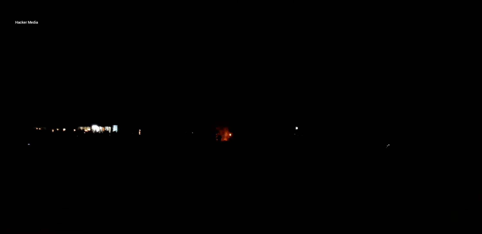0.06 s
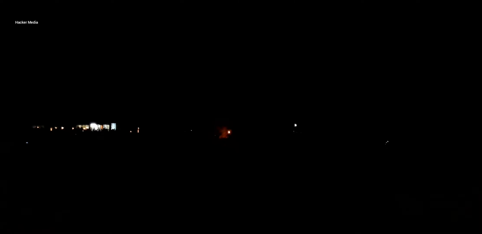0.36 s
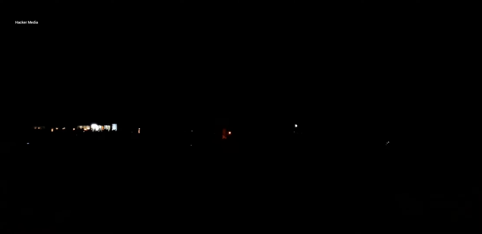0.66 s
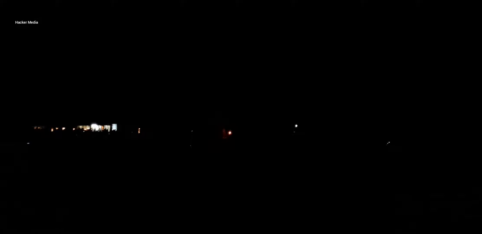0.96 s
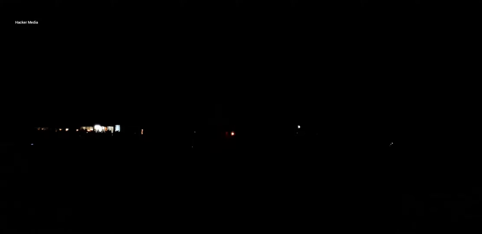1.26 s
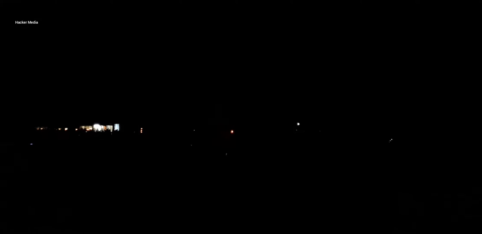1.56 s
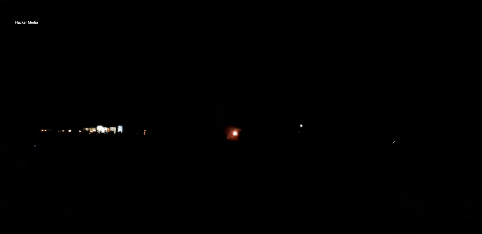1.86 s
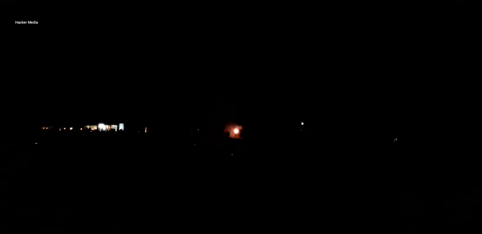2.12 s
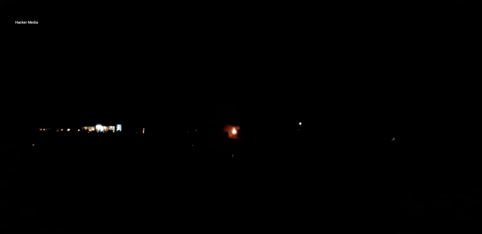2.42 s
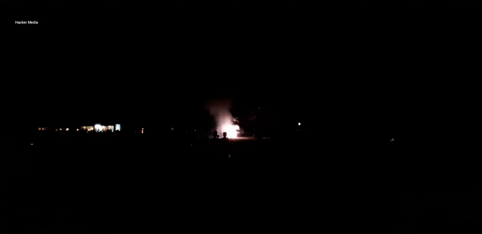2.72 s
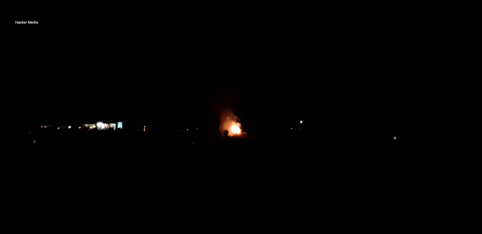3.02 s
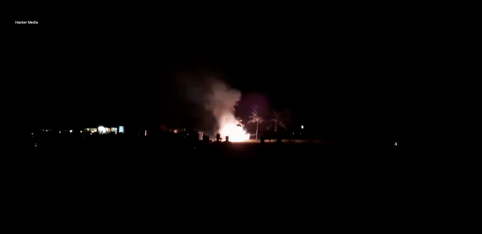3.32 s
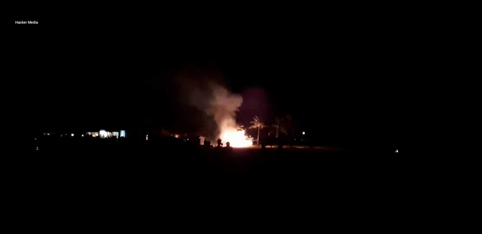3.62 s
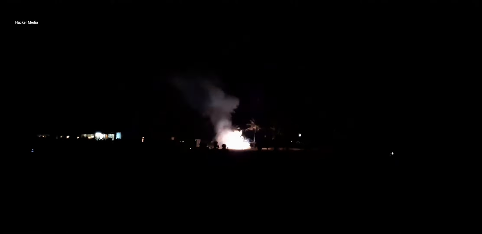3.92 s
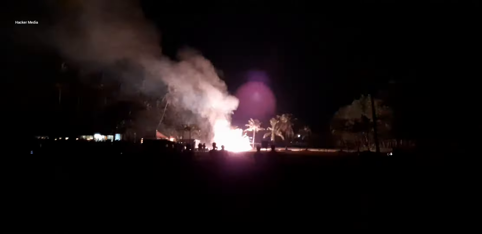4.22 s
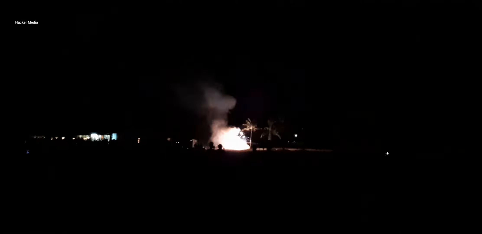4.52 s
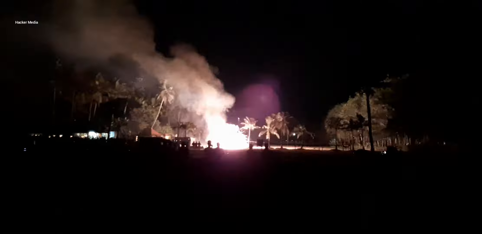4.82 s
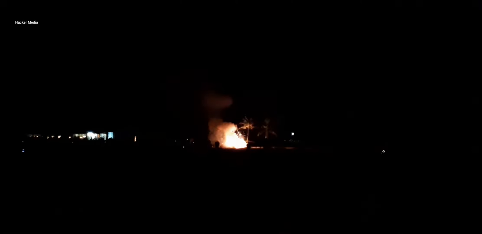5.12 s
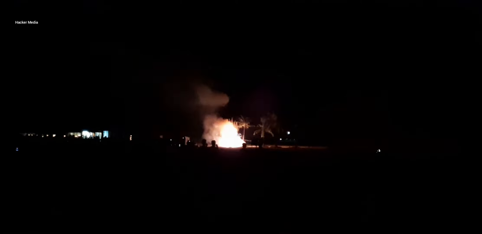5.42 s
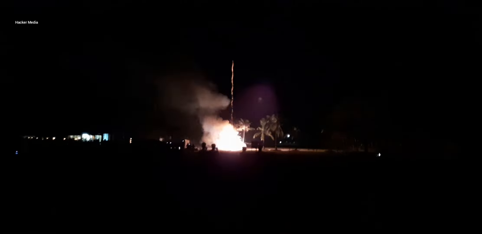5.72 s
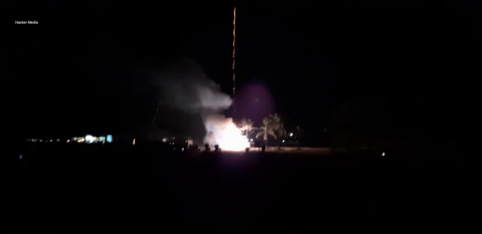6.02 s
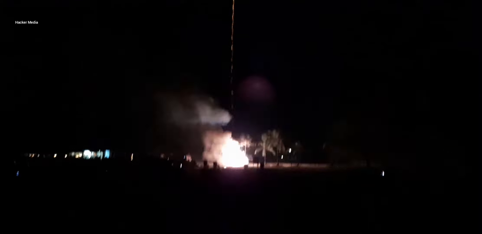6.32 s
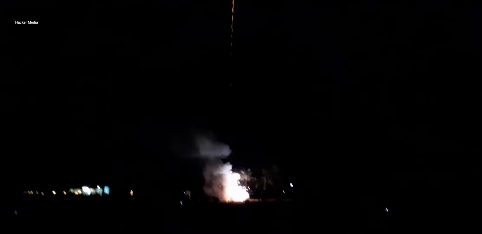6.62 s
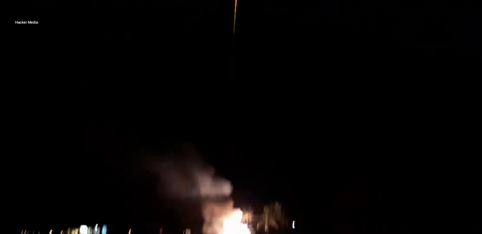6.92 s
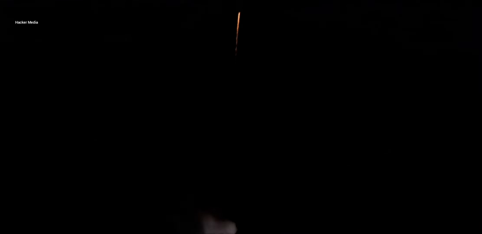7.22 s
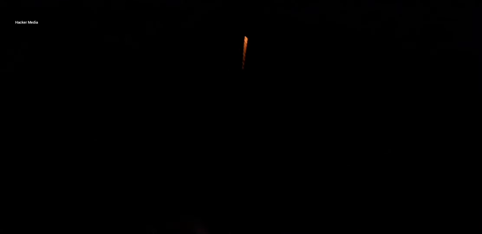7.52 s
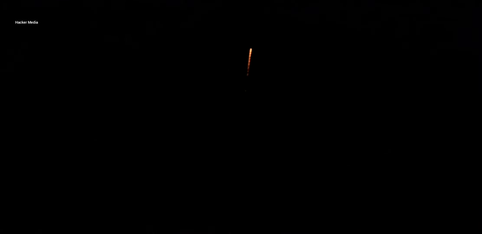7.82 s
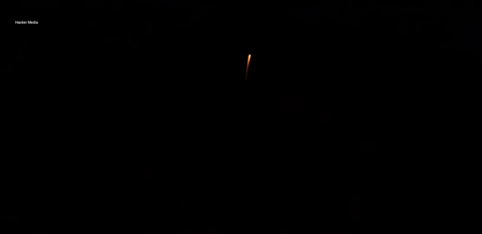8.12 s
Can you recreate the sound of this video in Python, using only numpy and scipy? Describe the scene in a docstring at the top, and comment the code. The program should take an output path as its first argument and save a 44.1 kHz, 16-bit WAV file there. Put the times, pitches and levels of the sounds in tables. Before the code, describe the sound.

A distant bang fades under night insects, then a ground firework erupts with hissing sparks, dense popping crackers and deep mortar thumps.

```python
"""A far bang rumbles away over a night field while a katydid and a cricket rub their wings in song.
A faint squeal, a far thud and small snaps follow. Then a ground firework lights: crackers pop over
a hissing jet of sparks, and powder charges thump shells out of mortars. The tree line throws
the thumps back; a small two-port microphone with a limiter takes it in."""
import sys
import numpy as np
from scipy import signal
from scipy.io import wavfile
from scipy.ndimage import uniform_filter1d, minimum_filter1d

SR = 44100
rng = np.random.default_rng(int(sys.argv[2]) if len(sys.argv) > 2 else 0)


def store_wav(level_fs):
    """Save 16-bit WAV to argv[1]."""
    pcm = np.round(np.clip(np.atleast_2d(level_fs), -1, 1) * 32767)
    wavfile.write(sys.argv[1], SR, pcm.T.astype(np.int16))


N = 368579
TIME = np.arange(N) / SR
PORT_LAG_S = 4 / SR  # the left port hears the firework first


def gain_of(db):
    """Decibels to gain."""
    return 10 ** (np.asarray(db) / 20)


def unit_rms(x):
    """Scales to rms 1."""
    return x / np.sqrt(np.mean(x ** 2) + 1e-20)


def curve_at(points, hz):
    """Reads a curve on a log-frequency axis."""
    f, value = np.transpose(points)
    return np.interp(np.log(hz + 1), np.log(f + 1), value)


def add(mix, s, sound):
    """Mixes a sound in at s seconds."""
    part = mix[..., max(round(s * SR), 0):][..., :sound.shape[-1]]
    part += sound[..., :part.shape[-1]]


def equalise(x, eq, size=2048):
    """Minimum-phase EQ: the ringing follows each click."""
    log_gain = np.log(gain_of(curve_at(eq, abs(np.fft.fftfreq(size, 1 / SR)))))
    taps = np.fft.ifft(np.exp(np.conj(signal.hilbert(log_gain)))).real
    return signal.oaconvolve(x, taps[:size // 2] / abs(taps).max())[:len(x)]


def ports(x):
    """One direct sound at both microphone ports, slightly later on the right."""
    return np.array([x, np.interp(TIME - PORT_LAG_S, TIME, x)])


# How alike the two ports hear a noise bed: f/Hz, coherence/0-1
COHERENCE = [(50, 1), (150, 0.9), (400, 0.75), (1200, 0.095), (3000, 0.3), (6000, 0.039), (15000, 0.049)]
def noise_bed(eq, patchy_db, lag_s=0, size=512):
    """Partly coherent stereo noise at rms 1, with patches of its spectrum swelling and fading."""
    frames, hz = N // (size // 4) + 5, np.fft.rfftfreq(size, 1 / SR)
    a, b, c, d, patches = rng.standard_normal((5, frames, len(hz)))
    patches = unit_rms(uniform_filter1d(uniform_filter1d(patches, size=10, axis=0), size=9, axis=1))
    alike = curve_at(COHERENCE, hz)
    left = a + 1j * b
    right = (alike * left + np.sqrt(1 - alike ** 2) * (c + 1j * d)) * np.exp(-2j * np.pi * hz * lag_s)
    spectra = np.array([left, right]) * gain_of(curve_at(eq, hz) + patchy_db * patches)
    _, bed = signal.istft(spectra.swapaxes(1, 2), nperseg=size, noverlap=size * 3 // 4)
    return unit_rms(bed[:, :N])


# Decay time of the open field: f/Hz, t60/s
FIELD_DECAY = [(100, 0.25), (500, 0.91), (1500, 0.3), (4000, 0.95), (12000, 0.072)]
def field_reverb(x, length_s=0.5, size=256):
    """Sparse reflections from ground, people and trees, different at each port."""
    n = int(length_s * SR)
    taps = rng.standard_normal((2, SR))[:, :n] * (rng.random((2, SR))[:, :n] < .15)
    taps[:, :SR // 1000] = 0  # pre-delay
    hz, t, spectra = signal.stft(taps, SR, nperseg=size)
    decay = gain_of(-60 * t / curve_at(FIELD_DECAY, hz)[:, None])
    _, tail = signal.istft(spectra * decay, SR, nperseg=size)
    return signal.oaconvolve(x[None], tail / np.linalg.norm(tail, axis=1)[:, None], axes=1)[:, :N]


# Dark tone of the far bang: f/Hz, relative level/dB
RUMBLE_EQ = [(25, -22), (60, -12), (115, -1.5), (210, -13.5), (430, -0.5), (830, -11), (1600, -22),
             (3500, -37.5), (7000, -69)]
def far_rumble(crest_s=0.38, crest_db=-37.5, rise_db_per_s=8, fall_db_per_s=13, floor_db=-60):
    """A far bang swells, then rolls away into a low floor."""
    age = TIME - crest_s
    roll = gain_of(crest_db + np.minimum(rise_db_per_s * age, -fall_db_per_s * age))
    second_swell = gain_of(-43.5) * np.exp(-((TIME - .97) / 0.057) ** 2)
    level = np.sqrt(roll ** 2 + second_swell ** 2 + gain_of(floor_db) ** 2)
    return level * noise_bed(RUMBLE_EQ, patchy_db=2.5, size=2048)


# Tone of the night ambience: f/Hz, relative level/dB
CHORUS_EQ = [(300, -7), (1200, -14), (2000, -14.5), (3000, -10.5), (5200, -11), (6100, -16), (7770, -4),
             (9000, -14), (10300, -11.5), (13500, -33)]
def insect_chorus(level_db=-58):
    """Distant insects blur into a steady bed."""
    return gain_of(level_db) * noise_bed(CHORUS_EQ, patchy_db=3.5)


def katydid(first_s=0.099, every_s=.169, chirp_s=0.067, strokes_per_s=185, level_db=-43, fade_s=0.64):
    """Chirps on a steady beat, each a quick train of wing strokes that slide down in pitch."""
    song, t = np.zeros(N), np.arange(int(chirp_s * SR)) / SR
    for s in first_s + every_s * np.arange(16) + 0.0038 * rng.standard_normal(16):
        wobble = unit_rms(uniform_filter1d(rng.standard_normal(len(t)), size=240))
        stroke_phase = np.cumsum(strokes_per_s * (1 + 0.13 * wobble)) / SR % 1
        hz = 8350 - 1150 * stroke_phase - 300 * (t / chirp_s - .5)
        chirp = np.sin(np.pi * stroke_phase) ** 2 * np.sin(2 * np.pi * np.cumsum(hz) / SR)
        envelope = signal.windows.tukey(len(t), .3) * min((s + chirp_s) / fade_s, 1)
        add(song, s, gain_of(level_db + rng.normal()) * envelope * chirp)
    return song + gain_of(-4) * field_reverb(song)


# Cricket phrases: first stroke t/s, last stroke t/s, stroke count, stroke length/s
CRICKET_PHRASES = [(.115, .355, 5, .032), (.48, .835, 14, .021), (1.054, 1.353, 6, .032),
                   (1.468, 1.92, 19, .02), (2.184, 2.494, 6, .032), (2.628, 2.812, 8, .02)]
def cricket(top_hz=5980, end_hz=5080, level_db=-57, fade_s=0.2):
    """Each wing stroke is a falling whistle; slow and fast phrases take turns."""
    song = np.zeros(N)
    for first, last, strokes, length in CRICKET_PHRASES:
        progress = np.linspace(0, 1, int(length * SR))
        for s in np.linspace(first, last, strokes):
            hz = (top_hz + (end_hz - top_hz) * progress ** 0.8) * rng.uniform(0.96, 1.015)
            whistle = np.sin(np.pi * progress) * np.sin(2 * np.pi * np.cumsum(hz) / SR)
            add(song, s, gain_of(level_db + 0.5 * rng.normal()) * whistle)
    song *= np.minimum(TIME / fade_s, 1)
    return song + gain_of(-8.5) * field_reverb(song)


# Glide of the faint squeal: t/s, level/dB, f/Hz
SQUEAL_GLIDE = [(.55, -72, 3130), (.66, -58, 3150), (.73, -67, 3280), (.9, -61.5, 3520), (1.25, -68, 3830)]
def squeal(width_hz=300):
    """A breathy, rising tone from far away."""
    s, level_db, hz = np.transpose(SQUEAL_GLIDE)
    lowpass = signal.butter(2, width_hz / 2, fs=SR, output="sos")
    breath = signal.sosfilt(lowpass, rng.standard_normal((2, N)))
    tone = unit_rms(breath * np.sin(2 * np.pi * np.cumsum(np.interp(TIME, s, hz)) / SR))
    return tone * np.interp(TIME, s, gain_of(level_db), left=0, right=0)


# Powder blasts (a far thud, the igniter, then the mortars):
# t/s, thump level/dB, f/Hz, crack level/dB, tail level/dB
BLASTS = [(.945, -34.5, 115, -52, -47), (2.844, -28, 132, -19, -59), (3.054, -1, 119, -3.5, -16),
          (3.107, -0.5, 132, -21, -17), (4.478, -6, 129, -10, -26), (5.038, -2.5, 131.4, -3, -19.5),
          (5.081, -5, 136, -8, -22.5), (6.344, -13, 148, -10, -33.5), (7.007, -11.5, 146, -8.5, -37),
          (7.162, -12.5, 130, -8, -33), (8.294, -13, 133.5, -9, -34)]
# Boomy tone of their rolling tail: f/Hz, relative level/dB
TAIL_EQ = [(25, -24), (60, -12), (105, 4), (185, -7), (250, -8), (500, -6.5), (1200, -26), (6000, -80)]
def powder_blasts(echo_s=0.055, echo_db=-4, front_s=.0009, tail_rise_s=0.0068, tail_decay_s=0.26):
    """A charge gives a steep shock front, a low thump and a crack; trees return it and let it roll on."""
    body, cracks, overload_clicks, tail_power = np.zeros((4, N))
    t = np.arange(3 * SR // 2) / SR
    for s, db, hz, crack_db, tail_db in BLASTS:
        age = t * hz / 0.75  # the thump's envelope peaks 3/4 of a cycle in
        thump = -age ** 2 * np.exp(2 * (1 - age)) * np.cos(2 * np.pi * hz * t)
        add(body, s, gain_of(db) * thump)
        add(body, s + echo_s, gain_of(db + echo_db) * thump)
        onset = s - .002
        add(body, onset, gain_of(crack_db) * (1 - t / front_s) * np.exp(-t / front_s))
        rush = gain_of(crack_db) * rng.standard_normal(len(t))
        add(cracks, onset, rush * (np.exp(-t / 0.0054) + 0.65 * np.exp(-t / 0.024)))
        add(overload_clicks, onset, gain_of(-6) * rush * np.exp(-t / 0.0009))
        tail = gain_of(tail_db) * (1 - np.exp(-t / tail_rise_s)) * np.exp(-t / tail_decay_s)
        add(tail_power, s, tail ** 2)
    # each blast overloads the microphone with a brief bright click; the rush behind it is dull
    cracks = overload_clicks + signal.lfilter(*signal.butter(1, 1500, fs=SR), cracks)
    direct = ports(body + cracks) * gain_of([[.5], [-.5]])
    return direct + np.sqrt(tail_power) * noise_bed(TAIL_EQ, patchy_db=2.5, size=2048)


# Dull tone of the tree line's return: f/Hz, relative level/dB
TREES_EQ = [(60, -11), (200, -7), (330, 0), (600, 0.5), (1300, -28), (4000, -28)]
def tree_echo(delay_s=0.2, smear_s=0.076, return_db=-24):
    """The blasts come back from the tree line, late, smeared and thin in the bass."""
    power = sum(gain_of(db + return_db) ** 2 * np.exp(-((TIME - s - delay_s) / smear_s) ** 2)
                for s, db, *_ in BLASTS)
    return np.sqrt(power) * noise_bed(TREES_EQ, patchy_db=2.5, size=1024)


# Cues for the small snaps: t/s, peak level/dB, f/Hz
SNAPS = [(1.297, -39.5, 1370), (1.568, -41.5, 3670), (1.891, -44, 1200), (2.257, -42.5, 4160),
         (2.881, -21, 860), (2.905, -19, 3100)]
def small_snaps(decay_s=0.0046):
    """Short damped snaps, each ringing around its own pitch."""
    out, t = np.zeros(N), np.arange(SR // 20) / SR
    for s, db, hz in SNAPS:
        band = signal.butter(2, [hz - 450, hz + 450], "bandpass", fs=SR, output="sos")
        ring = signal.sosfilt(band, rng.standard_normal(len(t)) * np.exp(-t / decay_s))
        add(out, s, gain_of(db) * ring / abs(ring).max())
    return out


# How hard the fountain burns: t/s, level/dB
BURN_FADER = [(2.86, -28.5), (3.02, -34), (3.06, -26), (3.17, -17.5), (3.5, -27.5), (3.62, -23),
              (4.4, -24.5), (4.56, -21.5), (4.98, -25), (5.1, -29), (5.42, -24), (6.1, -22.5), (6.62, -21),
              (7.0, -29), (7.01, -23), (7.3, -23), (8.1, -28.5), (8.36, -19.5)]
def burn_envelope(flare_db=-17.5, flare_rise_s=0.0095, flare_decay_s=0.2, spray_decay_s=0.018):
    """The jet's strength: every blast fans it, and crackers throw in short sprays of sparks."""
    power = gain_of(np.interp(TIME, *np.transpose(BURN_FADER), left=-120)) ** 2
    power += (gain_of(-23) * volley_envelope()) ** 2
    age = np.arange(SR) / SR
    flare = (1 - np.exp(-age / flare_rise_s)) * np.exp(-age / flare_decay_s)
    for s, db, *_ in BLASTS:
        add(power, s, (gain_of(db + flare_db) * flare) ** 2)
    for s, db in SINGLE_POPS:
        add(power, s, (gain_of(db - 23.5) * np.exp(-age / spray_decay_s)) ** 2)
    return np.sqrt(power)


# Tone of the jet and its sparks: f/Hz, relative level/dB
HISS_EQ = [(40, -53), (140, 5), (320, -41.5), (700, 2), (1500, 3.5), (2300, 0), (3000, 1), (4200, -1),
           (5500, -9.5), (7600, -11), (9500, -20), (12000, -16), (15500, -31)]
# Rise and fall of the flames' low roar: t/s, relative level/dB
ROAR_FADER = [(2.87, -39), (3.01, -42), (3.1, -29.5), (4.04, -34), (4.5, -30), (6.62, -28.5), (6.9, -35),
              (8.14, -46)]
# Tone of that roar: f/Hz, relative level/dB
ROAR_EQ = [(40, -35), (130, 1), (250, -13), (480, 7), (750, 3), (1400, -22), (4000, -51)]
def fountain(lit_s=2.839, flutter_db=1.81, sparks_per_s=900, spits_per_s=45, spit_decay_s=0.0032):
    """A burning jet flutters, hisses and roars, with tiny snaps of sparks and short bright spits."""
    flutter = unit_rms(uniform_filter1d(uniform_filter1d(rng.standard_normal(N), size=500), size=200))
    jet = noise_bed(HISS_EQ, patchy_db=2, lag_s=PORT_LAG_S) * gain_of(flutter_db * flutter)
    # the jet is brighter the harder it burns, and for a moment when a grain of metal flares
    burn = burn_envelope()
    grains = (rng.random(N) < spits_per_s / SR) * np.minimum(rng.exponential(1, N), 3)
    spits = signal.lfilter([1], [1, -np.exp(-1 / (spit_decay_s * SR))], grains)
    jet += (gain_of(-5) * spits + gain_of(8) * burn) * np.diff(jet, prepend=0)
    clicks = (rng.random(N) < sparks_per_s / SR) * gain_of(8.5 * np.minimum(rng.exponential(1, N), 4))
    clicks *= rng.choice([-1, 1], N)
    sparks = gain_of(-9) * ports(unit_rms(equalise(clicks, HISS_EQ)))
    roar_level = gain_of(np.interp(TIME, *np.transpose(ROAR_FADER)) + 0.5)
    roar = roar_level * noise_bed(ROAR_EQ, patchy_db=3.5, size=1024)
    lit = np.clip((TIME - lit_s) / .004, 0, 1)
    return lit * (burn * (jet + sparks) + roar)


def pop(centre_hz=1280, ring_s=.00045, scatter_s=0.0047):
    """One cracker in stereo: a dry shock, one swing of its own pitch and a spray of close reflections."""
    t = np.arange(SR // 40) / SR
    hz = centre_hz * rng.uniform(.7, 1.3)
    shock = 0.2 * np.exp(-t / ring_s) * np.cos(2 * np.pi * hz * t)
    shock[0] += 1
    # one near reflection doubles the crack
    shock += rng.uniform(0, .7) * np.roll(shock, int(rng.uniform(.001, .004) * SR))
    shared, *each_port = rng.standard_normal((3, len(t)))
    return shock + .055 * np.exp(-t / scatter_s) * (shared + 1.14 * np.array(each_port))


# Crackers that stand out, with the sharp crack of the 5.04 s mortar launch at 5.036 s: t/s, relative level/dB
SINGLE_POPS = [(2.843, -7), (3.028, -5.5), (3.27, -3), (3.364, -2), (3.373, -1), (3.408, -4), (3.432, -6),
               (3.469, -2), (3.519, -7), (3.553, -5.5), (3.594, -5), (3.693, -6), (3.882, -3), (4.005, -3),
               (4.056, -5.5), (4.147, -6), (4.191, -4), (4.21, -4), (4.243, 0), (4.325, -3), (4.342, -5),
               (4.437, -7), (4.679, -3), (4.745, -2.5), (4.793, -7), (4.813, -4), (4.938, -5), (4.982, -6),
               (5.036, -4), (5.231, -4), (5.399, -3.5), (5.41, -4), (5.583, 0), (5.616, -1.5),
               (5.725, -2.5), (5.745, -4.5), (5.823, -3.5), (5.832, -3), (5.854, -5), (6.61, -6),
               (6.697, -5.5), (6.808, -7), (6.891, -1.5), (7.006, -1), (7.019, -5), (7.026, -5),
               (7.053, -2.5), (7.082, -1), (7.123, -5.5), (7.374, -7.5), (7.463, -6), (7.481, -5.5),
               (7.521, -1.5), (7.547, -5.5), (7.579, -4), (7.68, -6.5), (7.69, -6), (7.78, -6.5),
               (7.905, -6.5), (7.958, -7), (7.981, -9), (8.049, -9), (8.062, -9), (8.105, -4.5),
               (8.157, -5), (8.199, -3)]
# Strings of crackers firing in quick succession: t/s, length/s, relative level/dB
CRACKER_VOLLEYS = [(3.067, 0.026, -3), (3.821, 0.19, -11), (4.329, 0.036, -6.5), (4.447, 0.2, -8.5),
                   (5.482, 0.059, -4), (5.626, 0.072, -10.5), (5.871, 0.58, -6.5), (6.479, 0.12, -7.5),
                   (7.066, .045, -9), (7.149, .12, -5.5), (7.561, 0.091, -12), (7.785, 0.069, -6),
                   (8.163, 0.11, -9)]
# Tone of a cracker: f/Hz, relative level/dB
POP_EQ = [(60, -21), (250, -23.5), (550, -10), (780, 0), (1600, 1), (2150, -10), (2900, -6), (5500, -13.5),
          (9500, -26.5), (12000, -20.5), (16000, -30)]
def crackers(swarm_per_s=130, volley_per_s=75, strays_per_s=16, reverb_db=-13):
    """Single crackers, volleys and random strays stand out of a swarm of smaller ones."""
    loud, swarm = np.zeros((2, 2, N))
    for s, db in SINGLE_POPS:
        add(loud, s, gain_of(db) * pop())
    for s in rng.uniform(0, N / SR, int(swarm_per_s * N / SR)):
        add(swarm, s, gain_of(2 * min(rng.normal(), 1.6)) * pop())
    for start, length, db in CRACKER_VOLLEYS:
        for s in np.arange(start, start + length, 1 / volley_per_s):
            s += .33 * rng.normal() / volley_per_s
            add(loud, s, gain_of(db + rng.normal(-0.5, 2.4)) * pop())
    # from the first volley on, the fountain sets off strays, louder the harder it burns
    for s in np.arange(CRACKER_VOLLEYS[0][0], N / SR, 1 / strays_per_s):
        s += rng.random() / strays_per_s
        add(loud, s, gain_of(9 + np.interp(s, *np.transpose(BURN_FADER))) * pop())
    loud = np.array([equalise(side, POP_EQ) for side in loud])
    swarm = np.array([equalise(side, POP_EQ) for side in swarm])
    # levelled first, the swarm simmers with the fountain and swells with each volley
    swarm /= np.sqrt(abs(uniform_filter1d(swarm[0] ** 2, size=4000)) + 1e-6)
    swarm *= np.hypot(gain_of(-22) * volley_envelope(), gain_of(-11) * burn_envelope())
    left, right = loud + swarm
    direct = np.array([left, gain_of(-1) * ports(right)[1]])
    return gain_of(1.1) * (direct + gain_of(reverb_db) * field_reverb(left, length_s=0.55))


def volley_envelope(smooth_s=0.0059):
    """Each volley holds for its length, then dies quickly."""
    held = sum(gain_of(db) * ((TIME >= s) & (TIME < s + length)) for s, length, db in CRACKER_VOLLEYS)
    pole = np.exp(-1 / (smooth_s * SR))
    return signal.lfilter([1 - pole], [1, -pole], held + 1e-9)


def scene():
    """The night field with the firework on top."""
    night = far_rumble() + insect_chorus() + squeal() + katydid() + cricket()
    return night + small_snaps() + crackers() + fountain() + powder_blasts() + tree_echo()


def record(dry, low_cut_hz=50, ceiling=0.92, release_db_per_s=400, high_cut_hz=16000):
    """The microphone loses the deepest bass, a fast limiter holds the peaks, a high cut trims the top."""
    dry = signal.sosfilt(signal.butter(2, low_cut_hz, "highpass", fs=SR, output="sos"), dry)
    over_db = np.maximum(20 * np.log10(abs(dry).max(0) / ceiling + 1e-9), 0)
    held_db = -minimum_filter1d(-over_db, size=24)
    release_db = TIME * release_db_per_s
    reduction_db = np.maximum.accumulate(held_db + release_db) - release_db
    high_cut = signal.firwin(511, high_cut_hz, window=("kaiser", 9), fs=SR)
    return signal.oaconvolve(dry / gain_of(reduction_db), high_cut[None], "same")


dry = scene()
out = record(dry)
store_wav(out)
```